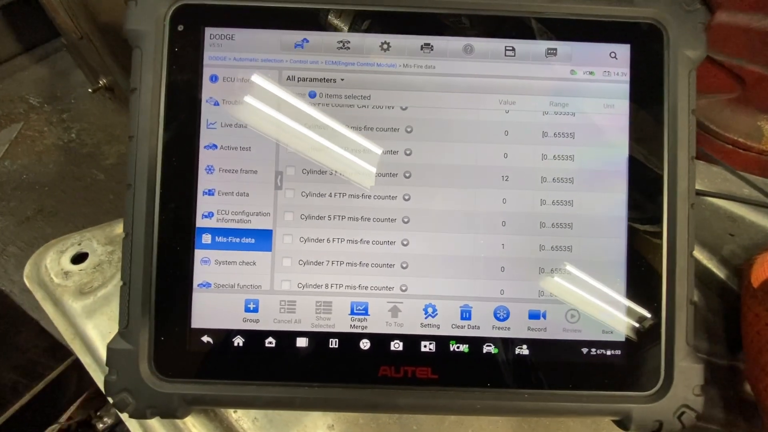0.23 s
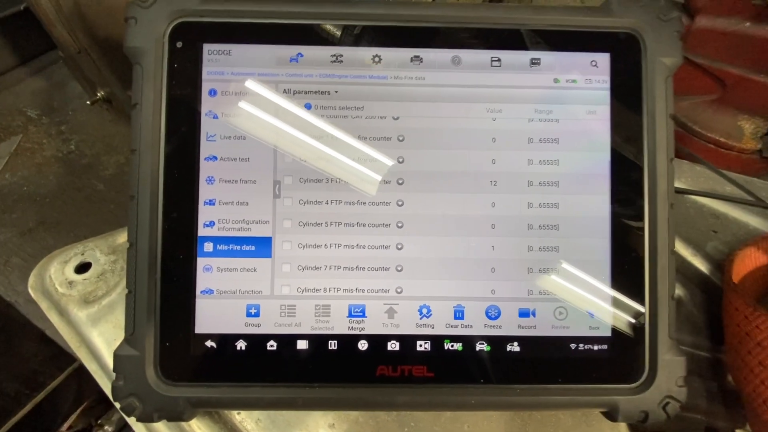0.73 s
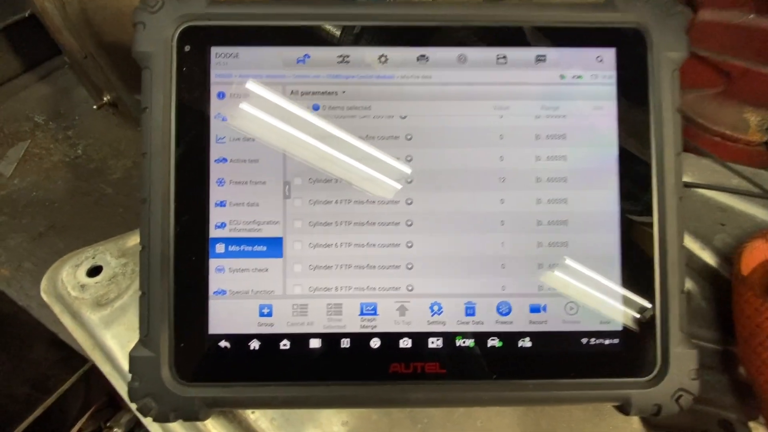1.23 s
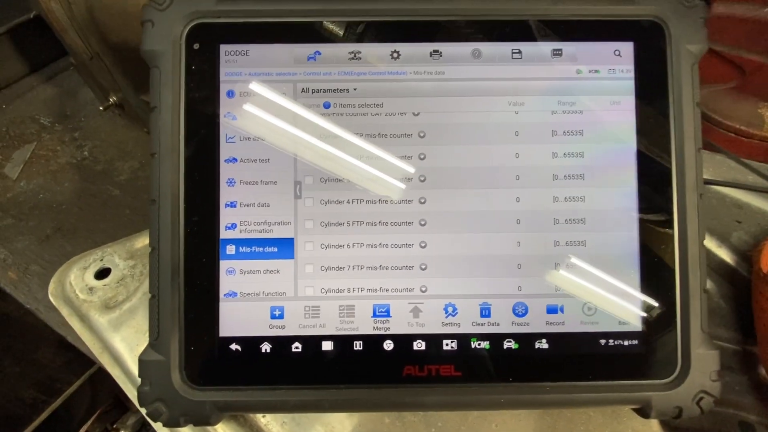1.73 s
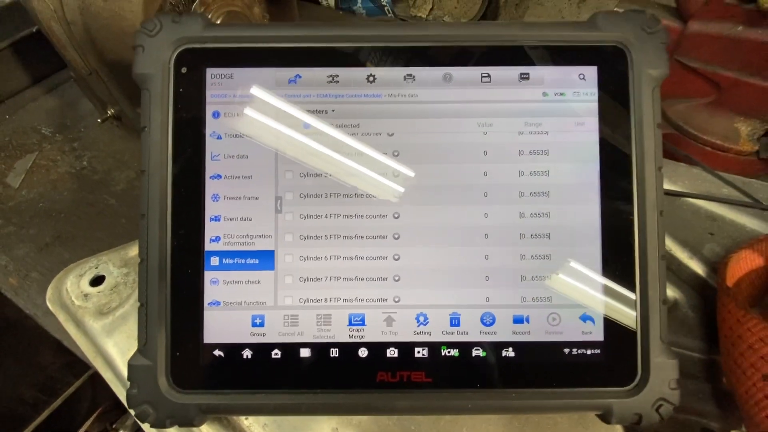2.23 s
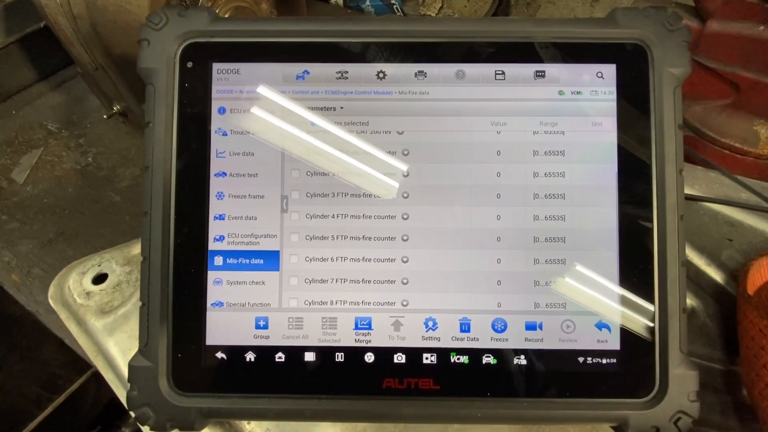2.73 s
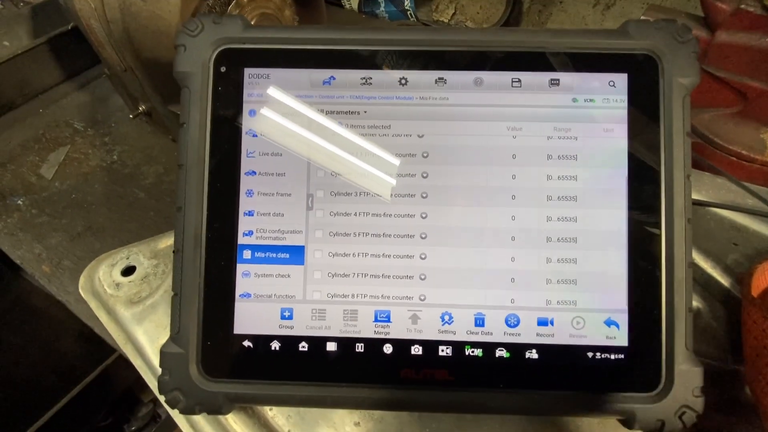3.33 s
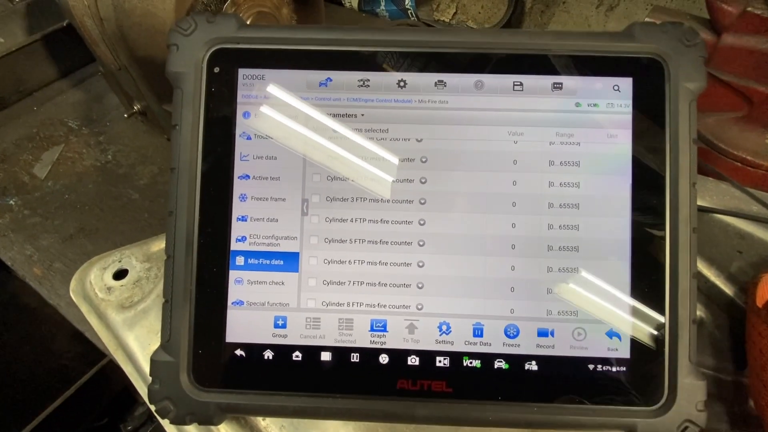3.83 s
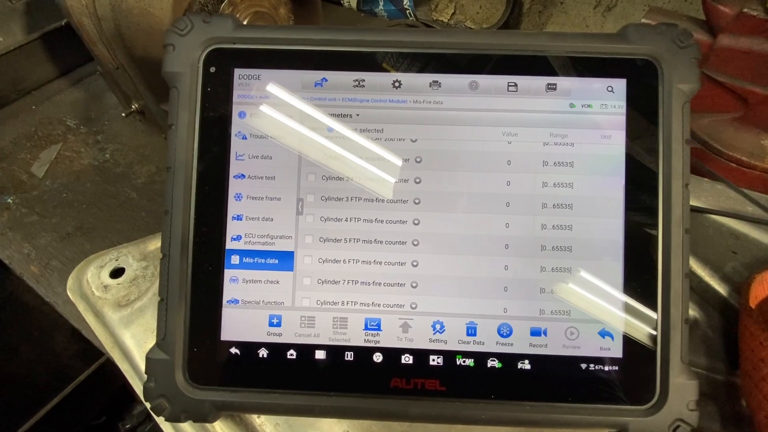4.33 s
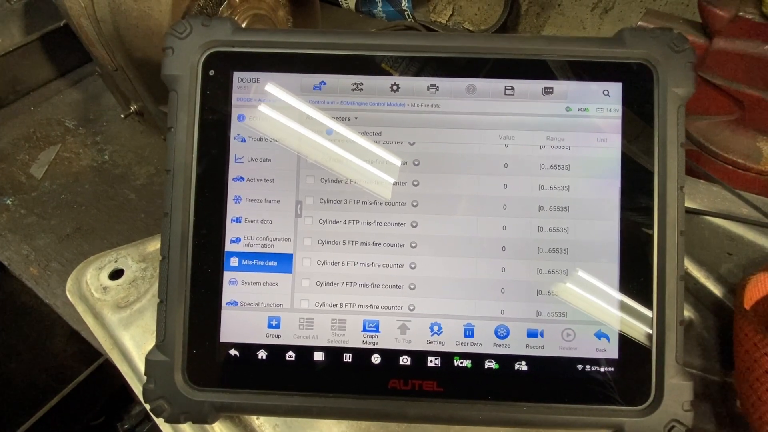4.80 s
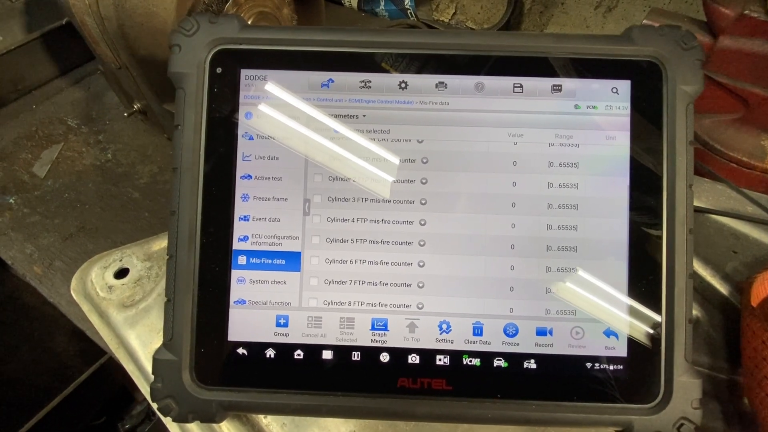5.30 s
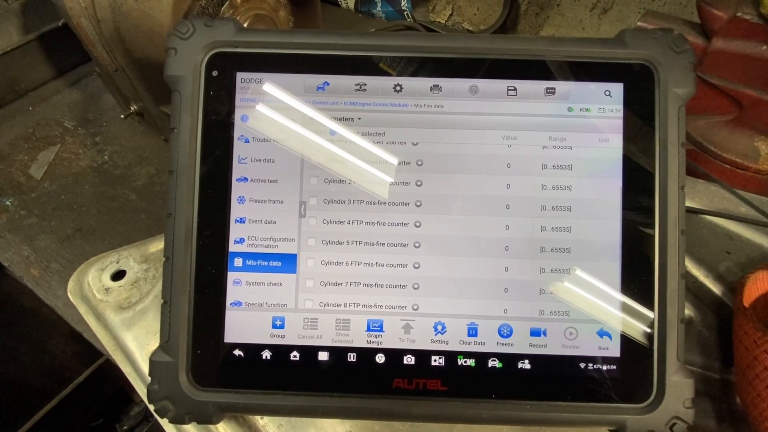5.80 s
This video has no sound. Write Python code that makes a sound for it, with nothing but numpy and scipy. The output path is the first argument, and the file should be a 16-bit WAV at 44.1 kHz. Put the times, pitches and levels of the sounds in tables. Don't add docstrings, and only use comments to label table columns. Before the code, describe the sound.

A big V8 idles close by in a workshop, a deep droning exhaust with a slight lope, metallic knocking, tappet ticks, belt whine and steady hiss.

```python
import sys
import numpy as np
from scipy import signal
from scipy.fft import rfft, irfft, next_fast_len
from scipy.io import wavfile
from scipy.ndimage import uniform_filter1d

SR = 44100
rng = np.random.default_rng(int(sys.argv[2]) if len(sys.argv) > 2 else 0)


def invert_db(level):
    return 10 ** (np.asarray(level, dtype=float) / 20)


def store_wav(level_fs):
    pcm = np.round(np.clip(np.atleast_2d(level_fs), -1, 1) * 32767)
    wavfile.write(sys.argv[1], SR, pcm.T.astype(np.int16))


N = 267113
T = np.arange(N) / SR


def ring(x, hz, width):
    b, a = signal.iirpeak(hz, hz / width, fs=SR)
    once = signal.lfilter(b, a, x)
    return signal.lfilter(b, a, once)


def unit(x):
    return x / np.sqrt(np.mean(x ** 2))


def walk(rate):
    k = int(SR / rate)
    steps = np.repeat(rng.standard_normal(N // k + 1), k)
    smooth = uniform_filter1d(uniform_filter1d(steps, k), k)
    return 1.3 * smooth[:N]


def left_right(db):
    return np.array([[db / 2], [-db / 2]])


def strikes(at, size):
    x = np.zeros(N)
    x[at] = size
    return x


def exhaust(turn, at, cyl, drone_db, fast, slow):
    cylinders = [
        (.647, 0),
        (.673, 1),
        (.69, .119),
        (.704, .353),
        (.693, .074),
        (.622, .424),
        (.672, .014),
        (.733, .567),
    ]
    # (pitch [Hz], width [Hz], level [dB], sign [+1 or -1])
    muffler = [(59.6, 45.5, 54.6, 1), (73.4, 19, 61.9, -1)]
    # (pitch [Hz], width [Hz], level [dB])
    tailpipe = (118.3, 21.2, 31.6)
    charge, jolt = np.transpose(cylinders)
    drone = np.sqrt(2) * invert_db(drone_db) * np.cos(2 * np.pi * turn)
    chance = rng.standard_normal((len(at), 3)).T

    swap = 0.04 * np.exp(-((T[at] - 5.72) / 0.15) ** 2)
    first_extra = (0.01 - swap) * (cyl == 0)
    sixth_extra = (0.002 + 0.018 * fast[at] + swap) * (cyl == 5)
    surplus = (charge - charge.mean())[cyl]
    uneven = strikes(at, surplus + first_extra + sixth_extra + 0.0081 * chance[0])
    lope = sum(sign * invert_db(db) * ring(uneven, hz, width) for hz, width, db, sign in muffler)

    hz, width, db = tailpipe
    shared = jolt[cyl] + 0.12 * chance[1]
    own = 0.15 * chance[2] + 0.16 * rng.standard_normal(8)[cyl]
    thud = np.array([invert_db(db + 1.0 + 0.72 * side) * ring(strikes(at, shared + side * own), hz, width)
                     for side in (1, -1)])

    octave_db = -46 - 7 * (1 - slow) + 1.6 * walk(2.5)
    octave = invert_db(octave_db) * np.cos(4 * np.pi * turn - 1.9 + 0.6 * walk(1.2))
    return octave + (drone + invert_db(1.0) * lope) * invert_db(left_right(1.4)) + thud


def metal(modes, turn, at, cyl, rattle, alike, peaked, drift_db):
    out = np.zeros((2, N))
    gap = np.mean(np.diff(at))
    for hz, width, *side_db, loudest in modes:
        habit = rng.choice([-1., 1.], (2, 8))
        lag = rng.random(8)
        late = np.minimum(at + (lag * gap).astype(int)[cyl], N - 1)
        rise = SR / (np.pi * width * gap)
        weight = np.exp(peaked * np.cos(np.pi / 4 * (turn + rise - loudest)))
        near, other = (weight * (unit(strikes(late, h[cyl])) + rattle * rng.standard_normal(N))
                       for h in habit)
        far = alike * near + np.sqrt(1 - alike ** 2) * other
        swell_db = drift_db * walk(0.85)
        for c, force in enumerate((near, far)):
            out[c] += invert_db(side_db[c] + swell_db) * unit(ring(force, hz, width))
    return unit(out)


def block(turn, at, cyl, fast):
    # (pitch [Hz], width [Hz], left level [dB], right level [dB], loudest at this firing [0-8])
    block_modes = [(180.5, 10.2, -47, -46.5, 6.1), (226.9, 8.4, -39.5, -47.5, 4.4),
                   (264.6, 22.6, -39, -38.5, 3.04), (289.4, 14.3, -42, -42.5, 4.2),
                   (313.2, 9.1, -43, -49, 1.2), (342.3, 13.7, -36, -42.5, 2.2), (371, 14, -40.5, -44, 5.3),
                   (404.8, 18, -44, -39.5, 0.78), (462, 25, -41, -58, 2.2), (511, 25, -44.5, -46, 1.9)]
    knock = metal(block_modes, turn, at, cyl, rattle=0.45, alike=0.68, peaked=0.44, drift_db=0.37)
    return invert_db(-34.5 - fast) * knock


def panels(turn, at, cyl, fast):
    # (pitch [Hz], width [Hz], left level [dB], right level [dB], loudest at this firing [0-8])
    panel_modes = [(569.2, 18, -50, -46, 4.4), (666.5, 33, -49.5, -46, 1.9), (718, 56, -41.5, -40.5, 2.6),
                   (764.3, 15, -39, -45, 2), (798.8, 21.6, -39, -39.5, 3.4), (832.7, 33, -42.5, -40.5, 4.5),
                   (902, 19, -39.5, -50, 7.8), (944, 30, -43, -44.5, 9), (1037, 88, -40.5, -43, 4.3),
                   (1197, 19, -49, -68, 1.2), (1404, 23, -51.5, -49, 4.3)]
    clatter = metal(panel_modes, turn, at, cyl, rattle=1.0, alike=0.12, peaked=0.28, drift_db=0.42)
    return invert_db(-32.5 - 0.1 * fast) * clatter


def air_color(column, hz):
    # (pitch [Hz], left level [dB per Hz], right level [dB per Hz], likeness of the two sides [-1 to 1])
    spectrum = [(170, -58.5, -64, 0.7), (357, -47, -50, 0.03), (820, -52.5, -54, 0.2),
                (1270, -53, -58.5, 0), (2550, -57, -63, 0), (3360, -63, -66.5, .01),
                (4730, -62, -67.5, 0.16), (5170, -59.5, -69, 0), (6130, -62.5, -67, 0),
                (6950, -61, -70.5, .05), (8750, -69, -69, 0), (9440, -75.5, -75.5, 0),
                (11400, -71, -71.5, 1), (12160, -72, -71.5, -.5)]
    table = np.transpose(spectrum)
    return np.interp(np.log(hz + 1e-9), np.log(table[0]), table[column])


def air(turn, fast):
    # (time [s], length [s], rise [dB])
    puffs = [
        (0.965, .03, 2.2),
        (1.385, 0.016, 4),
        (1.415, 0.032, 2.5),
        (1.835, 0.013, 4),
    ]
    size = next_fast_len(N)
    hz = np.arange(size // 2 + 1) * SR / size
    alike = np.clip(air_color(3, hz), -1, 1)
    mid, side = rfft(rng.standard_normal((2, size))) * np.sqrt([1 + alike, 1 - alike])
    left = (mid + side) * invert_db(air_color(1, hz))
    right = (mid - side) * invert_db(air_color(2, hz))
    pair = np.array([left, right])

    spit_db = sum(db * np.exp(-((T - s) / length) ** 2) for s, length, db in puffs)
    whole_cycle = 0.5 * np.cos(2 * np.pi * (turn / 8 - 0.85))
    half_cycle = 0.69 * np.cos(2 * np.pi * (turn / 4 - 0.5))
    breath_db = 0.52 * (whole_cycle + half_cycle)

    out = 0
    octaves = np.log2(hz + 1e-9)
    for centre in np.arange(7, 14.1, 0.5):
        band = np.cos(np.pi * np.clip(octaves - centre, -0.5, 0.5))
        noise = irfft(pair * band, size)[:, :N]
        spits_here = 10.3 < centre < 13.3
        out = out + noise * invert_db(0.73 * walk(9) + breath_db + spit_db * spits_here)
    return invert_db(-32.5 + 0.5 * fast) * unit(out)


def belt(turn):
    # (multiple of firing rate [1], level [dB], left minus right [dB])
    whines = [(29.3, -55.5, -2), (37.06, -54, -9), (40.73, -51.5, 4), (71.4, -53, 5)]
    out = 0
    for k, db, pan_db in whines:
        level = invert_db(db + 1.4 * walk(4.8) + left_right(pan_db))
        slip = np.cumsum(0.349 * walk(18)) / SR
        out = out + level * np.cos(2 * np.pi * k * (turn + slip) + np.array([[0], [1.5]]))
    return out


def intake(turn, slow):
    # (start pitch [Hz], end pitch [Hz], opens at firing [0-8], shuts at firing [0-8])
    whirr = (735, 925, 2.2, 6.9)
    low_hz, high_hz, opens, shuts = whirr
    slow_db, fast_db = -43.5, -54
    filled = np.clip((turn % 8 - opens) / (shuts - opens), 0, 1)
    note_hz = low_hz + (high_hz - low_hz) * filled + 14 * walk(30)
    phase = 2 * np.pi * np.cumsum(note_hz) / SR
    swell = np.sqrt(np.sin(np.pi * filled)) * invert_db(fast_db + (slow_db - fast_db) * slow)
    return np.array([swell * invert_db(db + 3.3 * walk(40)) * np.cos(phase + lag)
                     for db, lag in ((6.2, 0.25), (1.5, 0.87))])


def tappets(turn, slow):
    # (at firing [0-8], pitch [Hz], width [Hz], level [dB])
    knocks = [(3.55, 795, 45, -43), (2.25, 760, 45, -46), (.7, 780, 55, -49), (5.7, 893, 40, -45),
              (1.4, 900, 60, -51)]
    out = 0
    for firing, hz, width, db in knocks:
        at = np.flatnonzero(np.diff(np.floor((turn - firing) / 8)) > 0)
        force = invert_db(2.1 * rng.standard_normal(len(at)))
        out = out + invert_db(db) * unit(ring(strikes(at, force), hz, width))
    return out * invert_db(-3.5 * (1.5 - slow) + left_right(7))


def overtones(turn, hz):
    # (multiple of cycle rate [1], resonance pitch [Hz], width [Hz], level [dB])
    singing = [(33, 291, 4, -41), (34, 293.5, 3, -41), (36, 311.5, 4, -39), (39, 343, 5, -46),
               (42, 368.5, 6, -39.5), (47, 409.5, 4, -41), (80, 705, 6, -44), (104, 900, 4, -46),
               (109, 948, 2.5, -45)]
    out = 0
    for k, centre, width, db in singing:
        nearness = 1 / (1 + ((k * hz / 8 - centre) / width) ** 2)
        level = np.sqrt(2) * invert_db(db + 1.13 * walk(2.94)) * nearness
        wander = 0.36 * walk(2.09) + rng.uniform(-3, 3)
        apart = rng.uniform(-0.6, 0.43) * np.array([[1], [-1]])
        out = out + level * np.cos(np.pi / 4 * k * turn + wander + apart)
    return out


def scene():
    # (time [s], firing rate [Hz])
    idle = [(0.0, 70.218), (0.277, 70.32), (0.52, 70.763), (0.849, 70.331), (1.02, 69.573), (1.42, 69.489),
            (2.014, 69.803), (2.15, 70.466), (2.76, 70.503), (3.323, 69.025), (4.305, 69.464),
            (4.67, 69.187), (5.02, 69.169), (5.633, 68.15), (5.82, 68.768), (6.06, 69.931)]
    hz = np.interp(T, *np.transpose(idle))
    turn = np.cumsum(hz) / SR - 0.06
    at = np.flatnonzero(np.diff(np.floor(turn - 0.518)) > 0)
    cyl = np.round(turn[at] - 0.518).astype(int) % 8
    fast = hz - 69.6
    slow = 1 / (1 + np.exp((hz - 69.8) / 0.2))

    settle_db = -2.0 * np.exp(-T / 0.26)
    off_tune_db = -0.45 * (hz - 69.75) ** 2
    drone_db = -12.5 + off_tune_db + 0.67 * settle_db
    upper = block(turn, at, cyl, fast) + panels(turn, at, cyl, fast) + air(turn, fast)
    upper = upper + belt(turn) + intake(turn, slow) + tappets(turn, slow) + overtones(turn, hz)
    return exhaust(turn, at, cyl, drone_db, fast, slow) + invert_db(settle_db) * upper


def roll_off(x):
    return signal.sosfilt(signal.butter(12, 12680, fs=SR, output="sos"), x)


def record(dry):
    low_pass = signal.ellip(8, 0.2, 60, 12450, fs=SR, output="sos")
    mix = signal.sosfilt(low_pass, dry)
    return roll_off(mix)


dry = scene()
out = record(dry)
store_wav(out)
```